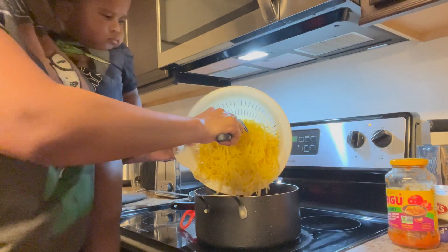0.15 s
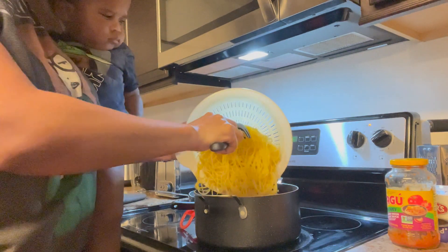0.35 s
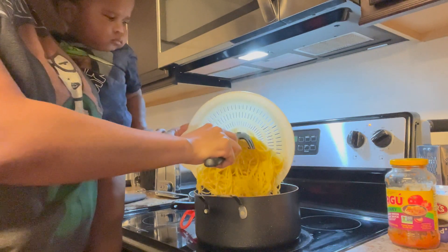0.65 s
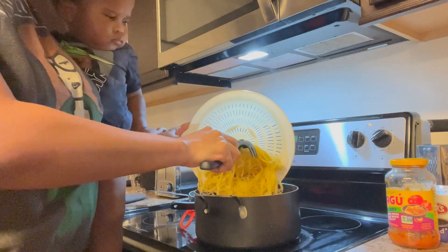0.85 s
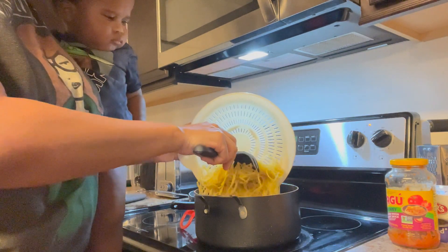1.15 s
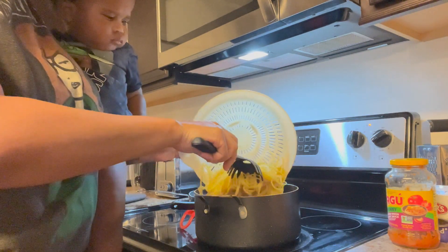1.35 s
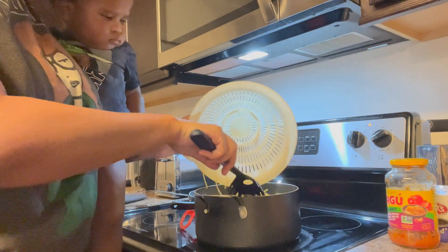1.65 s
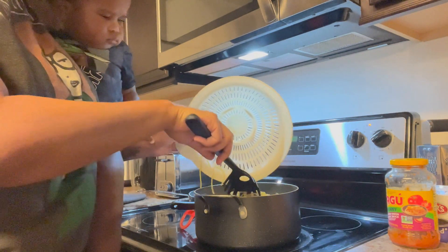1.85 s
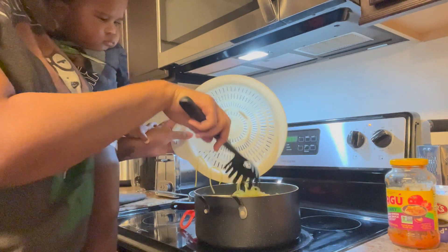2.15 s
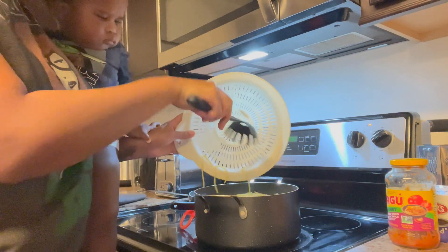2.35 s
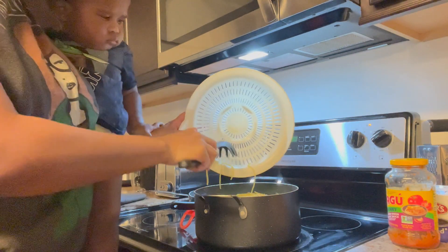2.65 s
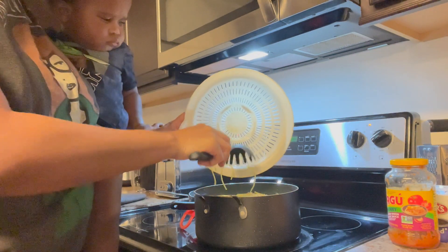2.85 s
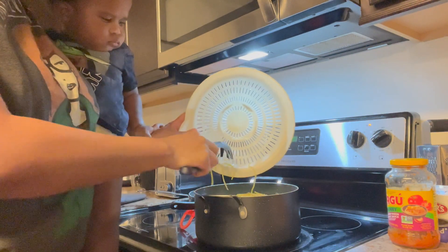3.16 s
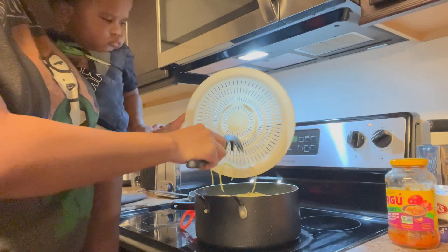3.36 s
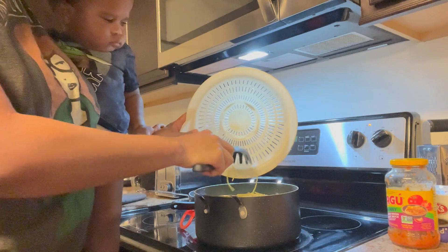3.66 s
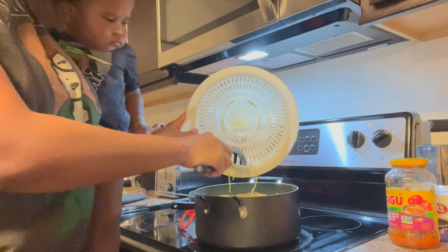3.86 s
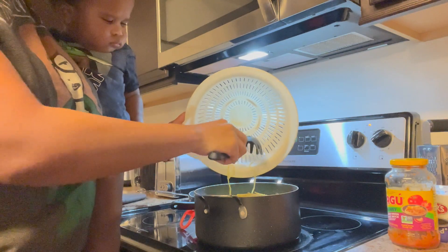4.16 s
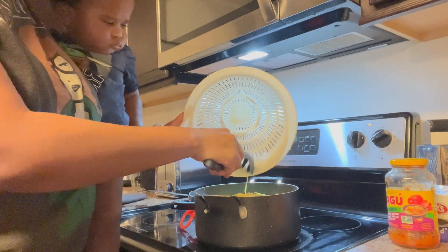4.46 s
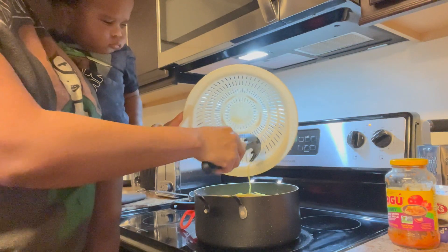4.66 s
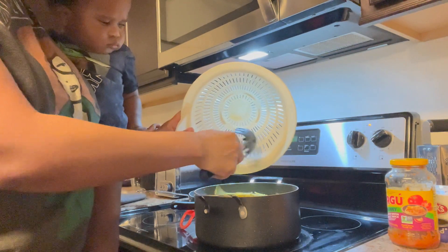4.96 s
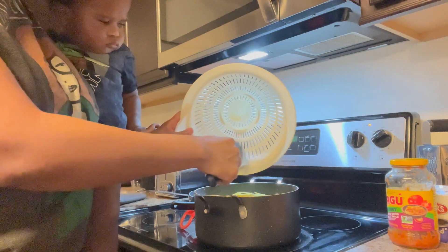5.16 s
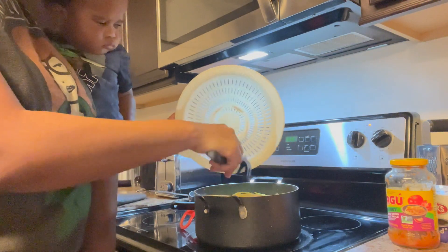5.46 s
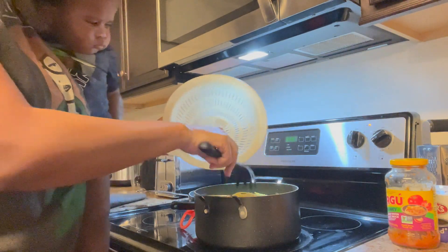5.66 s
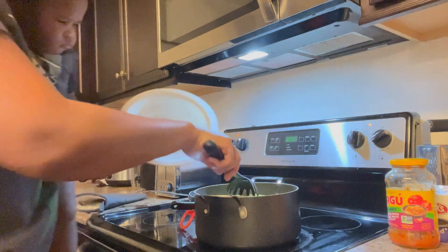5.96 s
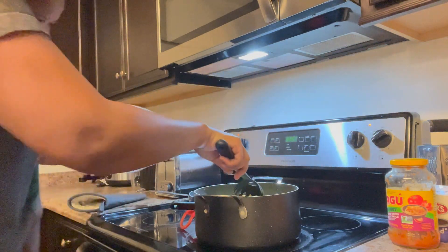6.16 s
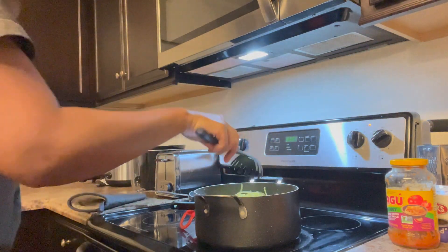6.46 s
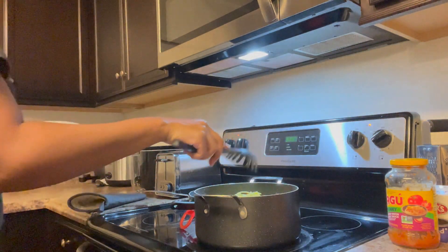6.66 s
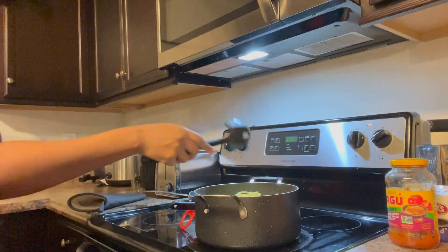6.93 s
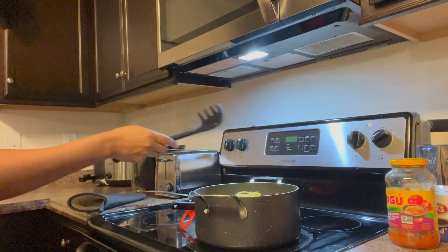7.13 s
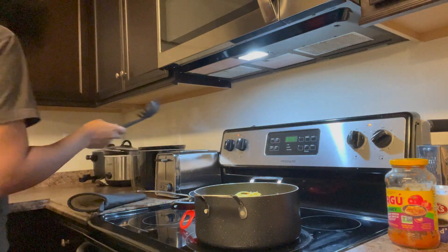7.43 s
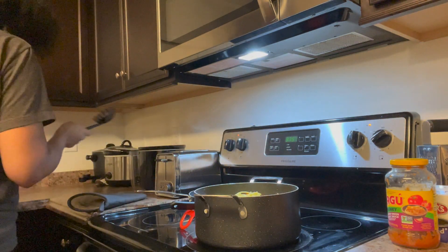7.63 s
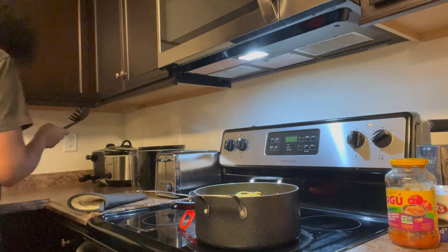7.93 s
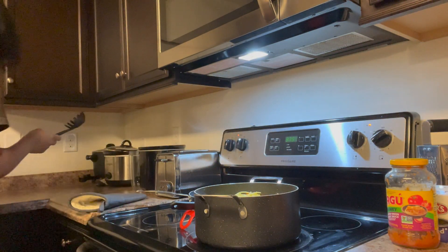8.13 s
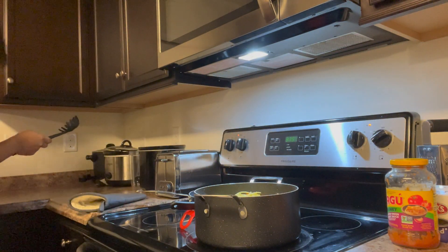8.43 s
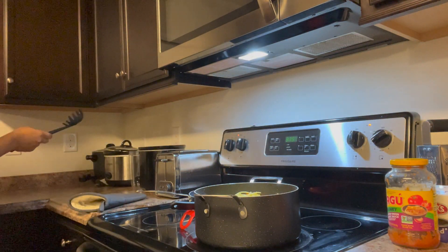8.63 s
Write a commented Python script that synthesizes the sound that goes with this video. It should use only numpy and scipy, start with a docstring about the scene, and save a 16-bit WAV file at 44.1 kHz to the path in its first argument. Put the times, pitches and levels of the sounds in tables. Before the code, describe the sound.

A low, wavering appliance hum with soft air rush runs throughout, in a small, slightly reverberant kitchen. From 0 to 2.5 s only very faint, dull taps and a light scrape are heard, the clearest around 1.6 s. From 2.6 to 4.3 s a hard plastic pasta server gives distinct, dry, quickly damped clacks on colander and pot, about two per second, the strongest near 3.85 s. Softer taps and a short drag follow until 5.2 s, then a quieter gap. Small sharp ticks come at 6.1 to 6.9 s, with crisp, hissy rustling strokes around 6.9 and 7.2 to 7.5 s. A dull tap and soft thump fall at 7.8 s. At 8.3 s two light knocks lead into an abrupt, very loud metallic clatter at 8.45 s, farther off, as a colander hits a steel sink: crack, ringing, rapid rattling, jingling and low thuds, with lesser blows until 8.7 s and a decaying tail.

```python
"""Taps, clinks and scrapes ring out close by, something rustles, and a loud metallic clatter follows.
Spaghetti is scraped from a plastic colander into a pot in a small kitchen where appliances hum.
The close contacts are short damped modes, and the rustle is stick-slip noise as the cook turns away.
After two light knocks the colander lands a few steps off, probably in a steel sink: modes, crack and thuds.
Wavering sine tones and coloured noise make the hum and air rush of the appliances."""
import sys
import numpy as np
from scipy import signal
from scipy.fft import rfft, irfft, next_fast_len
from scipy.io import wavfile
from scipy.ndimage import uniform_filter1d

SR = 44100
rng = np.random.default_rng(int(sys.argv[2]) if len(sys.argv) > 2 else 0)


def generate_wav(signal):
    """Clip the signal to [-1, 1] and save it as 16-bit WAV at the path in sys.argv[1]."""
    frames = np.transpose(np.atleast_2d(signal))
    scaled = np.clip(frames, -1, 1) * 32767
    pcm = np.round(scaled).astype(np.int16)
    wavfile.write(sys.argv[1], SR, pcm)


N = 387638
TIME = np.arange(N) / SR


def server(detune=0.022, snap_db=-2.5, snap_t60=0.0057, after_db=-26, after_t60=0.2,
           scrape_db=-11, scrape_t60=0.041, slips_per_s=500):
    """Modal synthesis: each close contact sounds as damped modes, a noise snap and a brief scrape."""
    # modes of the pasta server, shared by all close contacts [frequency_hz, level_db, decay_t60_s]
    server_modes = [(1050, -41, 0.087), (1310, -19, 0.03), (1614, 6.5, 0.011), (2266, 10.5, 0.0029),
                    (2950, -2.5, 0.0043), (3670, 1.5, 0.0035), (4500, 9, 0.0011), (5400, -9, 0.0014),
                    (6770, 8.5, 0.0022), (10000, -45, 0.00041), (13100, -45, 0.00067)]
    point_scatter_db = 4   # how unevenly one point of contact feeds the modes
    t = np.arange(SR // 5) / SR
    dry = np.zeros((1, N))
    hz, mode_db, t60 = np.transpose(server_modes)[:, :, None]
    # the hand damps each mode at once, but a faint ring lingers
    lingering = from_db(after_db) * np.sqrt(t60 / t60.max()) * fade(t, after_t60)
    decays = fade(t, t60) + lingering
    for s, *levels_db in close_contacts():
        strength, shift = rng.standard_normal((2, len(hz), 1))
        gains = from_db(mode_db + point_scatter_db * strength)
        waves = np.sin(2 * np.pi * hz * (1 + detune * shift) * t)
        ring = np.sum(gains * decays * waves, axis=0)
        snap = rng.standard_normal(len(t)) * fade(t, snap_t60)
        clack = unit_energy(ring) + from_db(snap_db) * unit_energy(snap)
        # the scrape: fainter copies of the clack at random instants
        slips = (rng.random(len(t)) < slips_per_s / SR) * rng.standard_normal(len(t)) * fade(t, scrape_t60)
        scrape = signal.fftconvolve(clack, unit_energy(slips))[:len(t)]
        clack = clack + from_db(scrape_db) * scrape
        add(dry, s, voiced(clack[None], levels_db))
    # plastic gives a little, which rounds off the top
    dry = signal.sosfilt(signal.butter(4, 12700, fs=SR, output="sos"), dry)
    # the sound reaches the right microphone four samples earlier
    pair = np.array([np.roll(dry[0], 4), dry[0]])
    room = kitchen(pair, early_db=0.0, early_t60=0.099, late_db=-4.0, late_t60=0.57, treble_t60=0.37)
    return from_db(-5.5) * room


def close_contacts():
    """Impact and friction: single contacts, and drags as runs of grazes that grow as pressure builds."""
    # taps and clinks of server, colander and pot, and sharp ticks of the rustle
    # [start_s, strength_db, hardness_db: dull below 0, sharp above]
    taps = [(0.354, -66.5, -12), (0.937, -69.5, -12), (1.076, -69.5, 10), (1.387, -59, -10),
            (1.473, -67, -11), (1.566, -51, -17.5), (1.607, -55.5, 4), (1.655, -61, -11), (2.596, -43, 1.5),
            (2.7266, -38, -2), (3.071, -37.5, 6.5), (3.4949, -38, 1.5), (3.555, -42.5, -5.5),
            (3.8436, -32, 4.5), (4.2889, -40, 4), (4.387, -49, 0), (4.7294, -49, 0), (4.7727, -52, 11.5),
            (5.074, -51, 2.5), (5.208, -51.5, -7), (6.1093, -59, 19), (6.1439, -44, 10.5),
            (6.5185, -58, 11), (6.6752, -63, 12), (6.8822, -49, 1), (7.3802, -51.5, 20.5),
            (7.459, -53.5, 26), (7.7993, -42.5, -8), (7.9661, -46.5, 7), (8.123, -66.5, 15)]
    # tines dragged over colander and pasta [start_s, length_s, final_strength_db, hardness_db]
    drags = [(0.086, 0.13, -73, 11), (2.656, 0.06, -52.5, -3), (4.461, 0.16, -69.5, -7),
             (5.146, 0.076, -54.5, 2), (5.894, 0.07, -65.5, 5), (6.114, 0.02, -51, 10)]
    grazes_per_s, build_db, scatter_db = 68, 1.5, 1
    hits = list(taps)
    for start, length, db, hardness_db in drags:
        progress = np.linspace(0, 1, int(length * grazes_per_s) + 2)
        for along, (jitter, size) in zip(progress, rng.standard_normal((len(progress), 2))):
            s = start + along * length + 0.15 * jitter / grazes_per_s
            graze_db = db - build_db * (1 - along) + scatter_db * size
            hits.append((s, graze_db, hardness_db))
    # at hardness 0 the low register lies 7 dB and the high one 11.5 dB below the middle
    return [(s, *register_levels(db, hardness_db, -7, -11.5)) for s, db, hardness_db in hits]


def clatter(ring_t60=0.21, damping_slope=0.14, ring_db=0.0, scatter_db=1.5, detune=0.0015,
            crack_t60=0.091, tail_db=-5.5, tail_t60=0.77, rise_s=0.0053):
    """Modal density: far contacts sound as a dense crack with a room wash; strong ones also ring as steel."""
    # ringing modes of the sink and the metal things in it [frequency_hz, level_db]
    steel_modes = [(548, -7), (602, -7), (704, -8), (796, -1), (864, -5), (1208, -11), (1315, -3),
                   (1354, -8), (1710, -8), (2112, -11), (2253, -5), (2474, -10), (2671, -7), (3077, -7),
                   (3350, -10), (3956, -11), (4718, -14), (5320, -11), (5459, -15), (7084, -11),
                   (7547, -17), (8688, -17), (8968, -16), (9517, -14), (9786, -9), (11746, -21),
                   (12629, -19), (13340, -21), (13695, -21)]
    # spectrum of the dense, quickly damped modes [frequency_hz, density_db_per_hz]
    crack_spectrum = [(150, -32), (300, -16), (450, -4), (560, -7), (780, 8), (1000, -3.5), (1500, 1),
                      (2300, -2.5), (3100, -3.5), (4200, -10.5), (6500, -17), (9700, -20.5), (11400, -19.5),
                      (12700, -18.5), (15000, -42)]
    full_ring_db = -26   # contacts lighter than this ring progressively less
    t = np.arange(SR // 2) / SR
    out = np.zeros((2, N))
    hz, mode_db = np.transpose(steel_modes)[:, :, None]
    # higher modes die sooner
    decays = from_db(mode_db) * fade(t, ring_t60 * (hz / hz[0]) ** -damping_slope)
    dense = noise(crack_spectrum, len(t))   # the same dense noise serves every contact
    for s, *levels_db in far_contacts():
        angle = 2 * np.pi * hz * (1 + detune * rng.standard_normal(hz.shape)) * t
        # uneven mode strengths, with a random phase in each channel
        phases = np.exp(2j * np.pi * rng.random((2, len(hz))))
        weight = from_db(scatter_db * rng.standard_normal(len(hz))) * phases
        ring = weight.real @ (decays * np.sin(angle)) + weight.imag @ (decays * np.cos(angle))
        wash = dense * np.hypot(fade(t, crack_t60), from_db(tail_db) * fade(t, tail_t60))
        graze_db = min(max(levels_db) - full_ring_db, 0)
        hit = from_db(ring_db + graze_db) * unit_energy(ring) + unit_energy(wash)
        add(out, s, voiced(hit * np.minimum(t / rise_s, 1), levels_db))
    return from_db(-1.5) * out


def far_contacts():
    """Repeated impact: the heaviest blow sets the colander rocking and loose metal things jingling."""
    # two light plastic knocks or scrapes, then the heavy blows in the sink
    # [start_s, strength_db, hardness_db]
    knocks_and_blows = [(8.306, -35.5, 7.5), (8.339, -36.5, 7), (8.413, -25.5, -3.5), (8.426, -20, 1.5),
                        (8.456, -11.5, 0), (8.466, -14.5, -6), (8.615, -24.5, -2.5), (8.691, -21.5, 0.5)]
    landing = max(knocks_and_blows, key=lambda contact: contact[1])[0]
    rocking = bounces(landing, period_s=0.026, db=-28, loss_db=0.6, hardness_db=-7.5, count=5)
    # a negative loss: each jingle is stronger than the last
    jingling = bounces(landing, period_s=0.019, db=-31.5, loss_db=-2.04, hardness_db=15.5, count=4)
    hits = list(knocks_and_blows) + rocking + jingling
    # at hardness 0 the low register equals the middle and the high one lies 10 dB below
    return [(s, *register_levels(db, hardness_db, 0, -10)) for s, db, hardness_db in hits]


def bounces(start, period_s, db, loss_db, hardness_db, count, unevenness=0.12):
    """Successive rebounds, unevenly spaced, whose level changes by a fixed step in decibels."""
    jitter = unevenness * rng.standard_normal(count)
    return [(start + period_s * (k + 1 + jitter[k]), db - loss_db * k, hardness_db) for k in range(count)]


def thuds():
    """Structure-borne sound: cupboards under the counter boom as decaying low-frequency noise."""
    # dull thuds [start_s, level_db, decay_t60_s]
    thud_events = [(7.797, -40, 0.14), (8.311, -43, 1), (8.462, -34, 0.83), (8.716, -35.5, 0.42)]
    # thud spectrum [frequency_hz, density_db_per_hz]
    thud_spectrum = [(30, -10), (50, 2), (90, 2.5), (150, -7), (260, 1.5), (450, -6), (900, -36)]
    t = np.arange(SR // 2) / SR
    out = np.zeros((2, N))
    for s, db, t60 in thud_events:
        add(out, s, from_db(db) * noise(thud_spectrum, len(t)) * fade(t, t60))
    return out


def rustle(slips_per_s=700, slip_db=-10.0, hiss_db=0.0, catch_db=4.0):
    """Stick-slip friction catches and lets go: tiny slips of uneven size in a bright hiss."""
    # rustle spectrum [frequency_hz, density_db_per_hz]
    rustle_spectrum = [(60, -48), (300, 5), (800, -8.5), (1500, 2.5), (2500, 1), (5000, -1.5), (7500, 2.5),
                       (10000, -1), (13000, -4), (15000, -17)]
    knots = np.arange(0, TIME[-1], .012)
    catching = np.interp(TIME, knots, catch_db * rng.standard_normal(len(knots)))
    level = strokes() * from_db(catching)
    slips = (rng.random(N) < slips_per_s / SR) * rng.standard_normal(N)
    size = next_fast_len(N, True)
    slips = irfft(rfft(slips, size) * from_db(on_bins(rustle_spectrum, size)), size)[:N]
    hiss = noise(rustle_spectrum, N)
    dry = level * (from_db(slip_db) * slips / slips.std() + from_db(hiss_db) * hiss)
    room = kitchen(dry, early_db=-2.5, early_t60=0.033, late_db=-7, late_t60=0.74, treble_t60=0.3)
    return from_db(-2.5) * room


def strokes():
    """Amplitude envelope of the friction: each stroke swells, holds and decays; the strongest prevails."""
    # rustling strokes [start_s, attack_s, hold_s, level_db]
    stroke_events = [(6.865, 0.028, 0.0098, -51), (6.92, 0.04, 0.082, -61), (7.235, 0.0072, 0.088, -47),
                     (7.37, 0.035, 0.12, -54), (7.859, 0.097, 0.02, -60.5)]
    gains = []
    for start, attack, hold, db in stroke_events:
        swell = np.clip((TIME - start) / attack, 0, 1)
        release = fade(np.maximum(TIME - start - attack - hold, 0), 0.34)   # t60 in s
        gains.append(from_db(db) * swell * release)
    return np.max(gains, axis=0)


def appliances(waver=0.26, direct_db=-4.5):
    """Tonal and broadband noise: wavering motor and mains tones over air rush, partly from the right."""
    # motor and mains tones [frequency_hz, level_db]
    motor_tones = [(44.5, -66.5), (59.5, -67.5), (179, -60), (357.5, -58), (474, -72), (651, -68),
                   (829, -80)]
    # air noise spectrum [frequency_hz, density_db_per_hz]
    air_spectrum = [(25, -101), (48, -81.5), (100, -81), (225, -84), (285, -76.5), (325, -80.5), (390, -77),
                    (460, -83.5), (610, -83.5), (1150, -102), (1850, -102), (2500, -117), (5000, -124),
                    (14000, -128)]
    knots = np.linspace(0, TIME[-1], 40)
    hum = 0
    for hz, db in motor_tones:
        # slow random drifts of amplitude and phase
        swell, sway = [np.interp(TIME, knots, waver * rng.standard_normal(len(knots))) for _ in range(2)]
        tone = np.sin(2 * np.pi * (hz * TIME + rng.random()) + 2 * sway)
        hum = hum + np.sqrt(2) * from_db(db) * (1 + swell) * tone
    rush = noise(air_spectrum, N, channels=1)[0]
    direct = np.array([np.roll(rush, 23), rush])   # the left channel lags by 23 samples
    air = noise(air_spectrum, N) + from_db(direct_db) * direct
    return from_db(-3.0) * hum + from_db(-54) * air


def kitchen(x, early_db, early_t60, late_db, late_t60, treble_t60):
    """Reverberation: direct sound, reflections from stove and cupboards, a tail with its own treble decay."""
    t = np.arange(SR * 3 // 4) / SR
    early, late = rng.standard_normal((2, 2, len(t)))
    dull = signal.sosfilt(signal.butter(2, 5500, fs=SR, output="sos"), late)
    treble = rng.standard_normal(late.shape)
    bright = signal.sosfilt(signal.butter(2, 5500, "high", fs=SR, output="sos"), treble)
    early = unit_energy(early * fade(t, early_t60) * (t > .002))
    tail = dull * fade(t, late_t60) + bright * fade(t, treble_t60)
    late = unit_energy(tail * np.minimum(t / 0.021, 1))
    response = from_db(early_db) * early + from_db(late_db) * late
    return x + signal.fftconvolve(x, response, axes=1)[:, :N]


def voiced(hit, levels_db):
    """Contact spectrum: crossovers split a hit into three registers, each given its own energy."""
    low_pass = [signal.butter(2, hz, "low", fs=SR, output="sos") for hz in (1900, 5000)]
    high_pass = [signal.butter(2, hz, "high", fs=SR, output="sos") for hz in (1900, 5000)]
    bands = [[low_pass[0]], [high_pass[0], low_pass[1]], high_pass]
    # each second-order filter is applied twice
    parts = [signal.sosfilt(np.vstack(filters * 2), hit) for filters in bands]
    mix = sum(from_db(db) * unit_energy(part) for db, part in zip(levels_db, parts))
    return np.sqrt(SR / 100) * mix   # 0 dB is the energy of 10 ms at rms 1


def register_levels(db, hardness_db, low_db, high_db):
    """Contact stiffness: a harder contact trades bass for treble (low, middle, high in dB)."""
    return db + low_db - hardness_db, db, db + high_db + hardness_db


def from_db(db):
    """Level to amplitude: 20 dB is a factor of ten."""
    return 10 ** (np.asarray(db) / 20)


def unit_energy(x):
    """Energy normalization: the summed squares average one over the channels."""
    return x / np.sqrt(np.mean(np.sum(x ** 2, axis=-1)) + 1e-20)


def fade(t, t60):
    """Exponential decay, 60 dB down after t60 seconds."""
    return np.exp(-np.log(1000) * t / t60)


def on_bins(points, size, axis=1):
    """Spectral interpolation: one table column over log frequency, read at the bins of an FFT."""
    points = np.array(points)
    bins_hz = np.fft.rfftfreq(size, 1 / SR)
    return np.interp(np.log(bins_hz + 1), np.log(points[:, 0]), points[:, axis])


def noise(spectrum, size, channels=2):
    """Spectral shaping of white noise to rms 1 overall, unrelated in each channel."""
    padded = next_fast_len(size, True)
    white = rfft(rng.standard_normal((channels, padded)))
    x = irfft(white * from_db(on_bins(spectrum, padded)), padded)[:, :size]
    return x / x.std()


def add(track, s, sound):
    """Superposition: mix a sound into a track from time s on."""
    start = int(s * SR)
    part = sound[:, :max(N - start, 0)]
    track[:, start:start + part.shape[1]] += part


def scene():
    """Superposition of everything that sounds in the kitchen."""
    return server() + clatter() + thuds() + rustle() + appliances()


def record(dry, notch_hz=8150, notch_q=12.9, hiss_db=-93):
    """Stereo pickup: level and phase between channels vary with frequency; peaks and top are limited."""
    # microphone pair [frequency_hz, side_minus_mid_db, left_minus_right_db, left_phase_lead_rad]
    pair_pattern = [(50, -8, -2, 0), (162, -14, 0.5, 0), (326, 6, -3.5, 0.12), (1000, 0, -1.8, 0.15),
                    (2670, 0.5, -2, 0), (5760, 0.5, -6, 1.6), (7770, 11, 0.5, 0), (7200, 9.5, -1.5, 0),
                    (14000, -10.5, 0.5, 1)]
    peak_ceiling = 0.95   # peaks are rounded off towards this height
    size = next_fast_len(N + SR, True)
    left, right = rfft(dry, size)
    # the pattern of the pair changes gradually with frequency
    columns = [on_bins(pair_pattern, size, axis=k) for k in range(1, 4)]
    side_db, lean_db, phase = [uniform_filter1d(column, size=7000) for column in columns]
    width = from_db(side_db)
    sides = np.array([[1], [-1]])
    pair = ((left + right) + sides * width * (left - right)) / np.sqrt(2 * (1 + width ** 2))
    lead = np.exp(.5j * sides * phase)
    x = irfft(pair * lead * from_db(sides * lean_db / 2), size)[:, :N]
    x = signal.lfilter(*signal.iirnotch(notch_hz, notch_q, fs=SR), x)
    x = x + from_db(hiss_db) * rng.standard_normal(N)   # the same faint hiss in both channels
    rounded = peak_ceiling * np.tanh(x / peak_ceiling)
    top_cut = signal.ellip(10, .2, 70, 14300, fs=SR, output="sos")   # steep, at 14300 Hz
    return signal.sosfilt(top_cut, rounded)


dry = scene()
out = record(dry)
generate_wav(out)
```